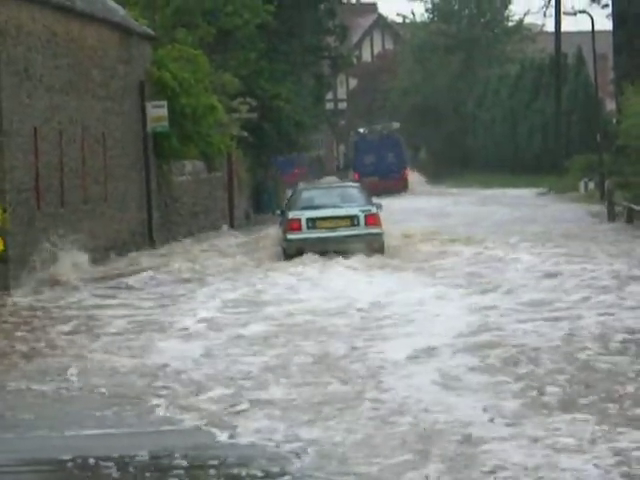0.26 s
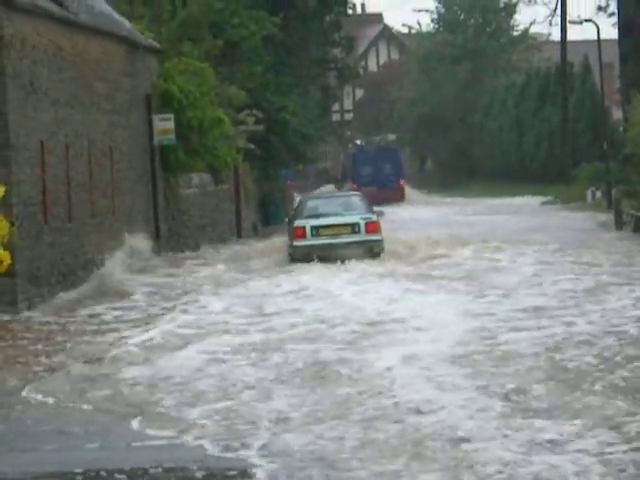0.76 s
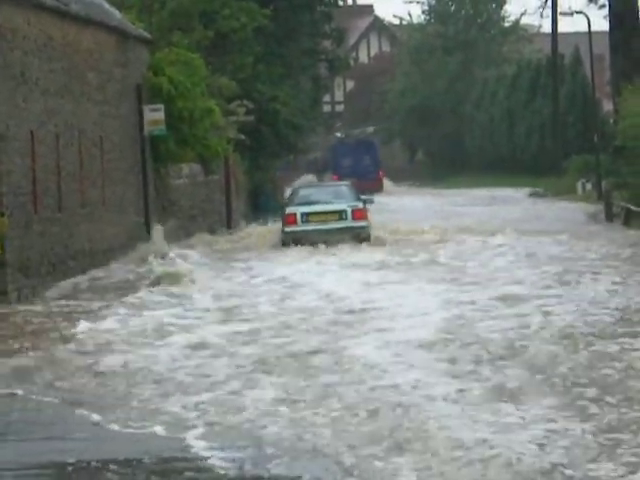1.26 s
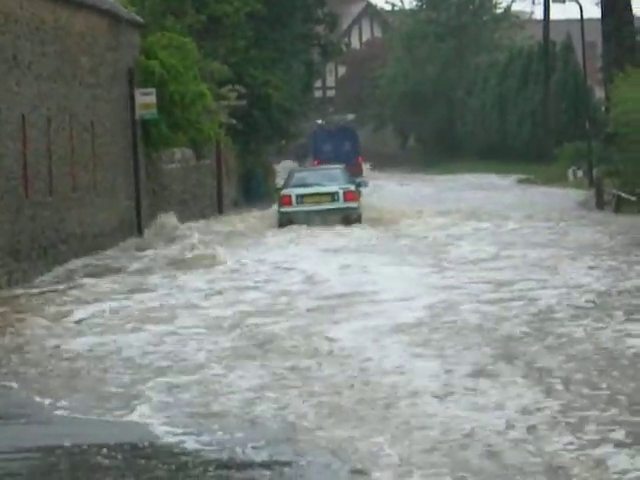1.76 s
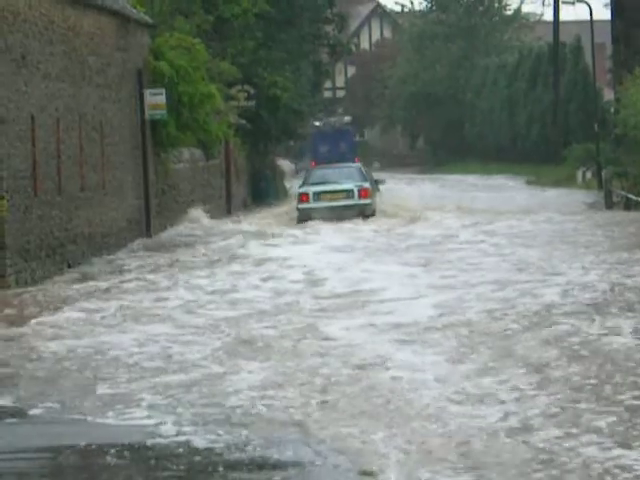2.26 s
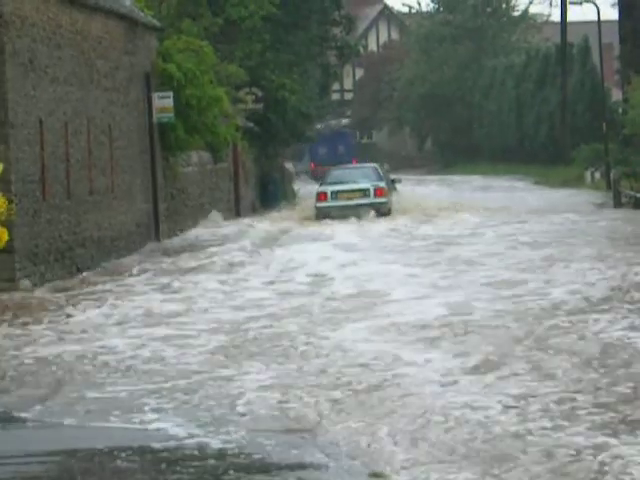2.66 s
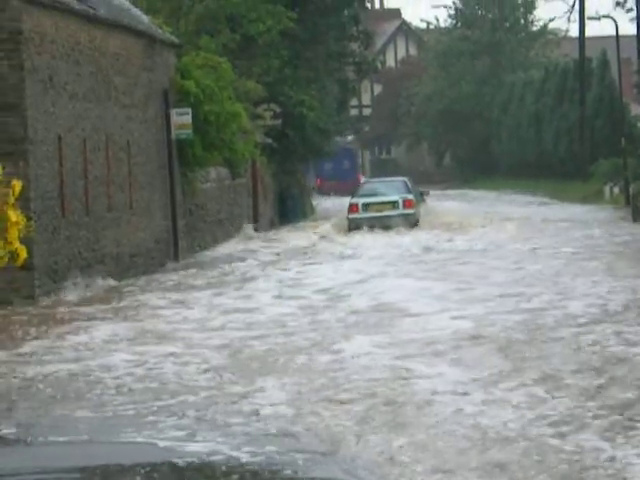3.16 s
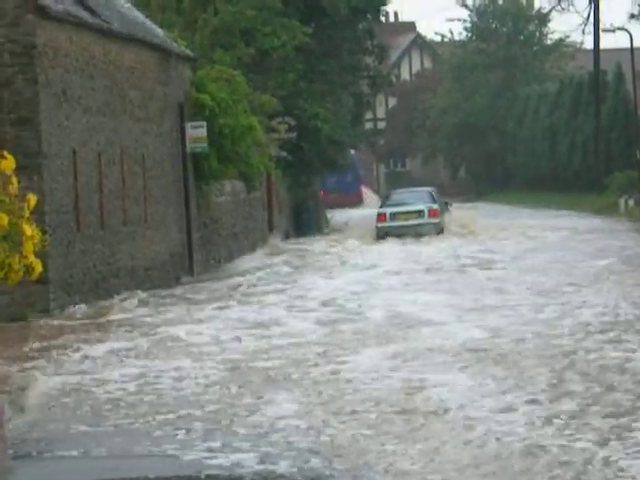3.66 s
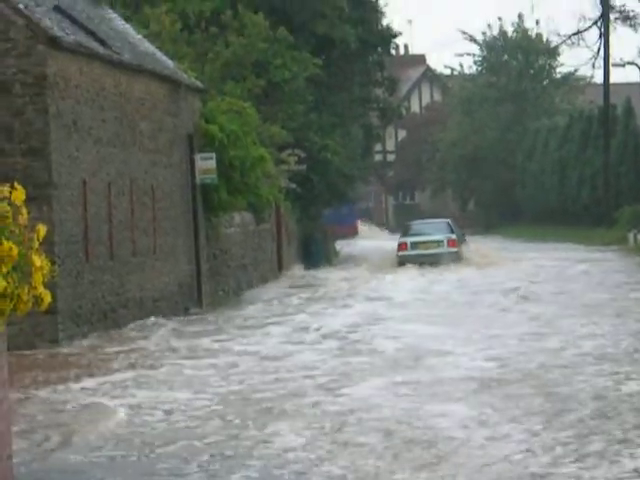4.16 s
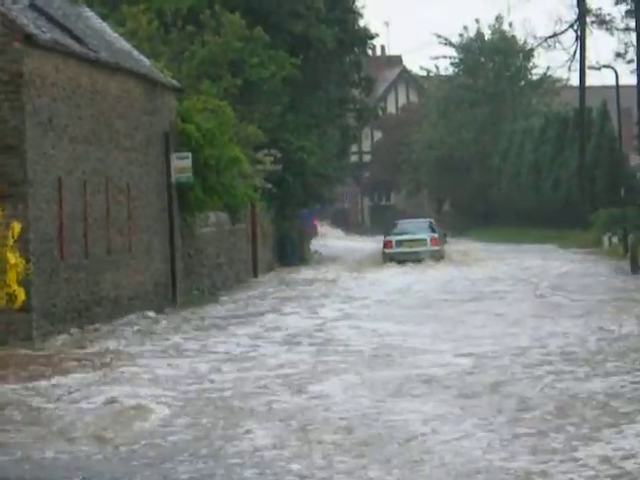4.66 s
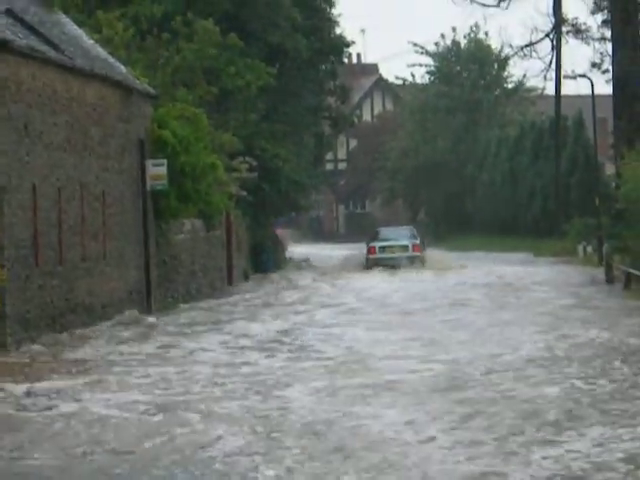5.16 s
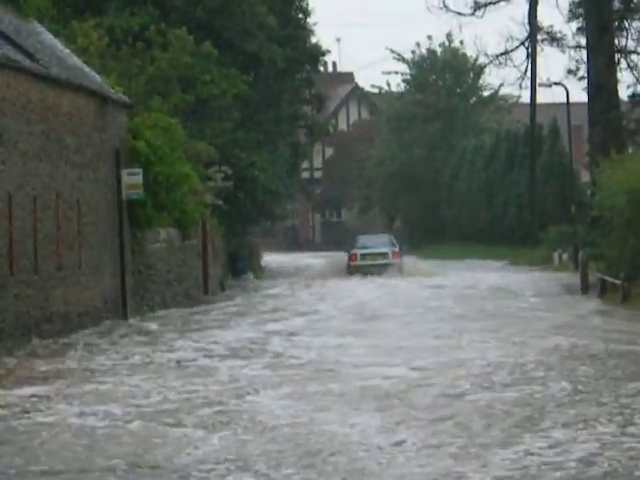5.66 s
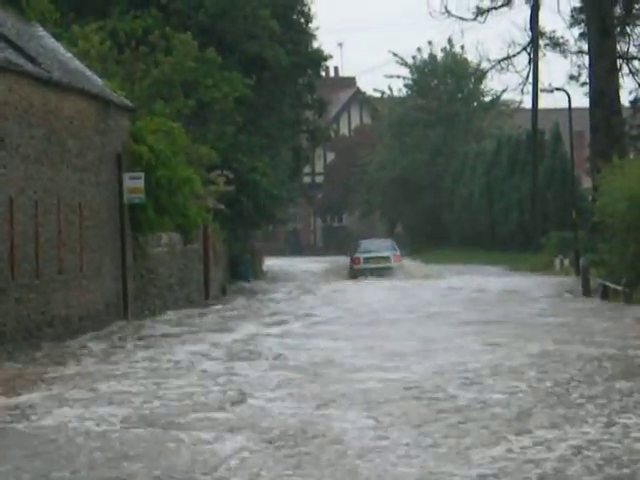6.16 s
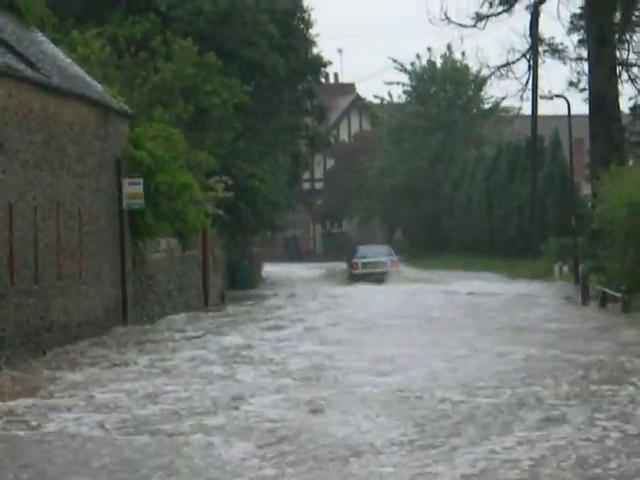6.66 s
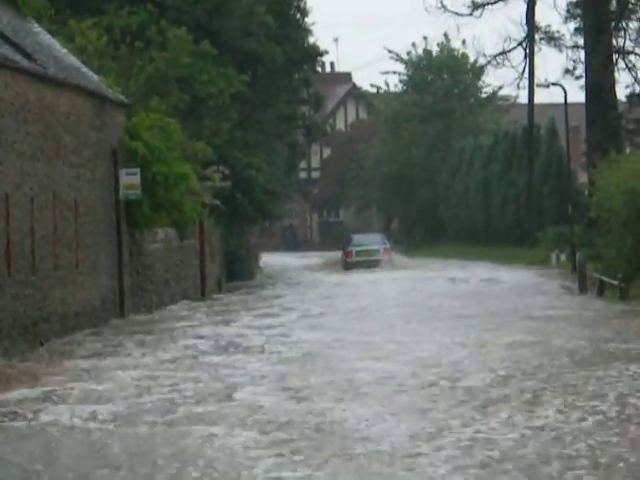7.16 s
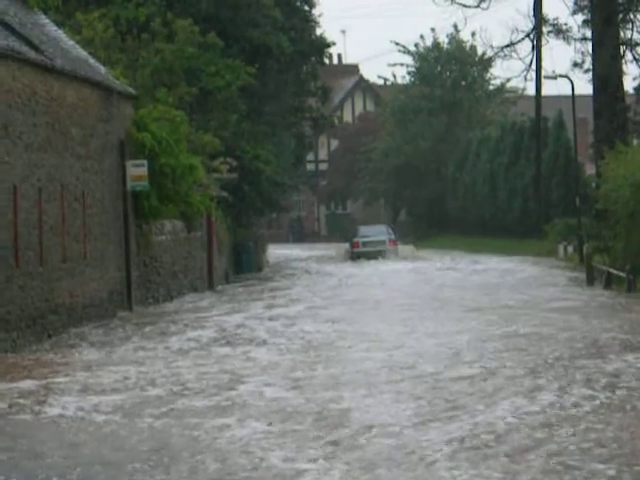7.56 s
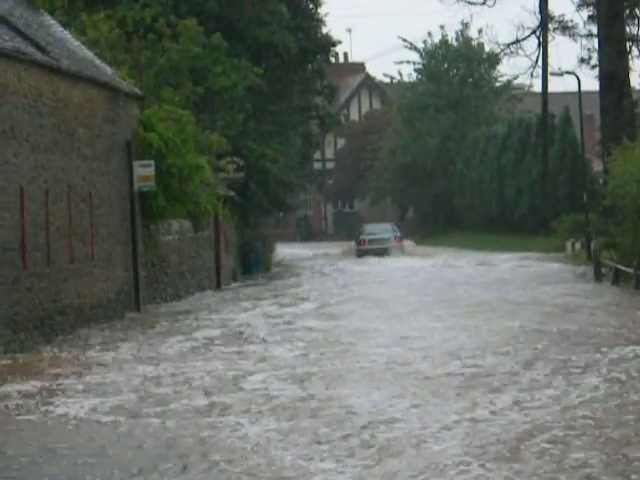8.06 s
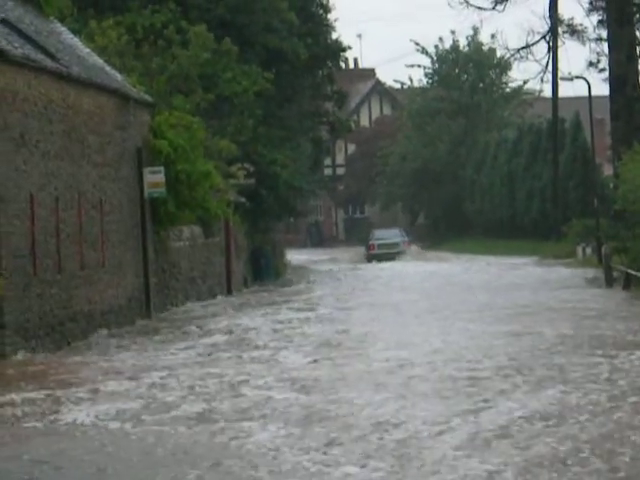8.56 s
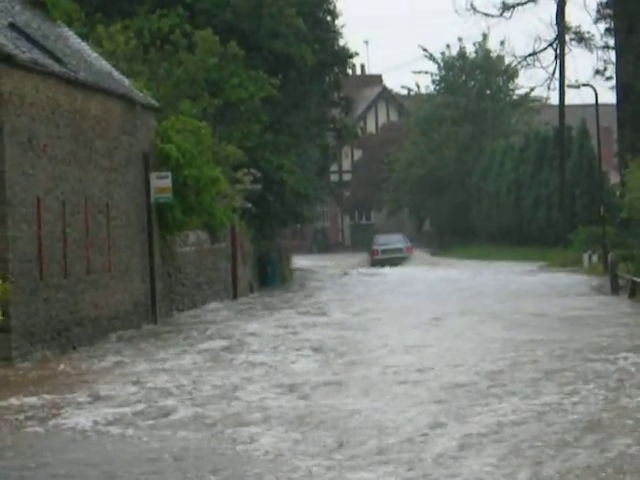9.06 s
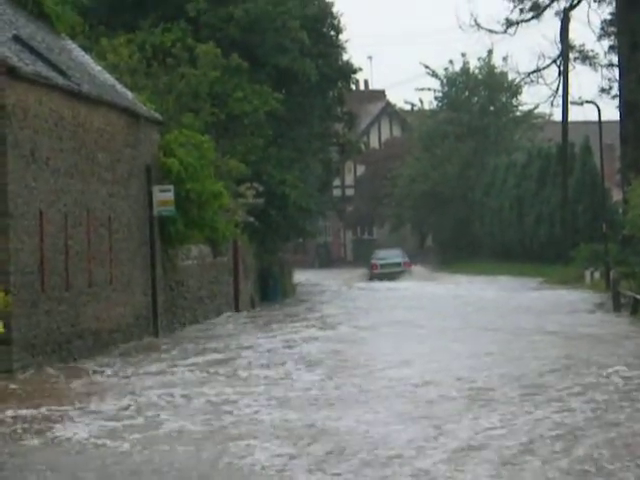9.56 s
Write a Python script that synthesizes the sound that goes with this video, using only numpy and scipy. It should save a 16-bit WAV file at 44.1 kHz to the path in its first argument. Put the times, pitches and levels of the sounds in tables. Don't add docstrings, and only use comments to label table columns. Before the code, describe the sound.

Muffled, narrow-band rush of turbulent water, constantly fizzing and slapping, over the low labouring hum of a car wading into the distance.

```python
import sys
import numpy as np
from scipy import signal
from scipy.fft import rfft, irfft
from scipy.io import wavfile
from scipy.ndimage import uniform_filter1d

SR = 44100
rng = np.random.default_rng(int(sys.argv[2]) if len(sys.argv) > 2 else 0)


def ratio(d):
    e = np.asarray(d, float) / 20
    return 10 ** e


def log_audio(samples):
    frames = np.atleast_2d(samples).T
    limited = np.clip(frames, -1, 1)
    pcm = np.round(limited * 32767).astype(np.int16)
    wavfile.write(sys.argv[1], SR, pcm)


N = 433048
OFFSET = -.02


def evened(x):
    return x / np.sqrt(np.mean(x ** 2) + 1e-20)


def read(points, hz):
    f, value = np.transpose(points)
    return np.interp(np.log(hz + 1), np.log(f + 1), value)


def follow(rows):
    s, *columns = np.transpose(rows)
    return [np.interp(np.arange(N) / SR, s, c) for c in columns]


def drift(rate_hz):
    z = rfft(rng.standard_normal(N))
    hz = np.fft.rfftfreq(N, 1 / SR)
    return evened(irfft(z / (1 + (hz / rate_hz) ** 2), N))


def burst(hz, cycles, rise_cycles=0.37, glide=.12):
    turns = np.arange(-3 * SR // hz, 8 * SR * max(cycles, .5) // hz) * hz / SR
    fall = (np.hypot(turns, .15) - .15) / max(.65 * cycles, .2)
    shape = np.exp(-np.where(turns < 0, (turns / rise_cycles) ** 2, fall))
    sound = shape * np.cos(2 * np.pi * (turns + glide * turns * abs(turns) / 2) - .5)
    if hz < 1600:
        crack_turns = turns * 2200 / hz
        sound += .45 * np.exp(-(crack_turns / .3) ** 2) * np.cos(2 * np.pi * crack_turns + .6)
    sound = sound - shape * sound.sum() / shape.sum()
    return sound / sound.max(), shape, int(3 * SR // hz)


def strike(events):
    out, cover = np.zeros(N + SR), np.zeros(N + SR)
    for s, db, hz, cycles in events:
        sound, shape, lead = burst(hz, cycles)
        at = round(s * SR) - lead
        out[at:at + len(sound)] += (ratio(db) - OFFSET) * sound
        cover[at:at + len(sound)] += 1.3 * shape
    return out[:N], np.clip(cover[:N], 0, 1)


def drone(hz, db, waver=.005, throb_db=2.5):
    turns = np.cumsum(hz * (1 + waver * drift(3))) / SR
    return 1.25 * ratio(db + throb_db * drift(5)) * np.sin(2 * np.pi * turns)


# frequency in Hz, level in dB.
IDLE = [(57, -69), (114, -48.5)]


def idling_engine():
    return sum(drone(hz, db) for hz, db in IDLE)


def far_engine():
    from_s, to_s, fade_s = 6.9, 8.2, .4
    start_hz, rise_hz_per_s = 63, 7
    t = np.arange(N) / SR
    heard = np.clip(np.minimum(t - from_s, to_s - t) / fade_s + 1, 0, 1)
    return heard * drone(start_hz + rise_hz_per_s * (t - from_s), -57)


# time in seconds, firing rate in Hz, labouring (2nd order) level in dB.
CAR = [(0, 80.5, -43), (.5, 81, -36), (1, 82, -37), (2, 86, -44), (2.5, 85.2, -49), (3, 87, -53),
       (3.7, 90.8, -55), (4, 91.2, -53), (4.7, 90.9, -53), (5.3, 87.5, -40), (6.3, 86.6, -38), (7, 85, -44),
       (8, 83, -45), (9, 78.4, -45)]


def wading_car():
    pipe_hz, pipe_width_hz, pipe_peak_db, away_db_per_s = 454, 18, -23.5, .8
    t = np.arange(N) / SR
    hz, labour_db = follow(CAR)
    detuning = 2 * (5 * hz - pipe_hz) / pipe_width_hz
    pipe_db = pipe_peak_db - away_db_per_s * t - 10 * np.log10(1 + detuning ** 2)
    firing = drone(hz, -52, throb_db=3.5)
    labour = drone(2 * hz, labour_db, throb_db=3.5)
    return firing + labour + drone(5 * hz, pipe_db, throb_db=2)


def foam(patchy_db=0.38, flicker_db=-0.65):
    frames = N // 128 + 5
    a, b, patches, gusts = rng.standard_normal((frames, 257, 4)).T
    patches = evened(uniform_filter1d(uniform_filter1d(patches, size=6, axis=0), size=16, axis=1))
    gusts = evened(uniform_filter1d(uniform_filter1d(gusts, size=40, axis=0), size=3, axis=1))
    z = (a + 1j * b) * ratio(patchy_db * patches + flicker_db * gusts)
    return evened(signal.istft(z, nperseg=512, noverlap=384)[1][:N])


def drops(per_s=500, spread_db=3):
    happens = rng.random(N) < per_s / SR
    size = ratio(spread_db * np.minimum(rng.exponential(1, N), 4.5)) * happens
    kind = rng.integers(0, 24, N)
    out = np.zeros(N)
    for k, hz in enumerate(np.geomspace(500, 4000, num=24)):
        grain = burst(hz, 1.5 + 0.85 * rng.random())[0]
        grain = grain / np.linalg.norm(grain) * np.sqrt(hz)
        out += signal.oaconvolve(size * (kind == k), grain)[:N]
    return evened(out)


# frequency in Hz, level in dB per Hz.
COLOUR = [(25, -43.5), (48, -34), (90, -24), (170, -11), (370, -3), (580, -0.5), (760, -3.5), (1200, -11.5),
          (1700, -11.5), (2300, -9.5), (2800, -12), (3300, -17)]
# time in seconds, level in dB.
SURGE = [(0, 2.5), (.4, .5), (.8, 2), (1.1, 0.5), (2, 0), (2.5, 1), (2.9, -0.5), (3.4, 0), (4.6, 0),
         (5.2, 0), (5.6, -1), (6.1, 0), (6.8, -1.5), (7.15, -1), (7.4, 1.5), (7.65, -.5), (8.7, -1.5),
         (9.2, -0.5)]


def rush(drop_share=0.16):
    roar_hz, fizz_hz = 300, 1100
    surge_share = (.6, .95, 0.18)
    recede_db_per_s = (0.26, 0.0043, 0.11)
    hz = np.fft.rfftfreq(N, 1 / SR)
    water = np.sqrt(1 - drop_share ** 2) * foam() + drop_share * drops()
    z = rfft(water) * ratio(read(COLOUR, hz))
    z = z / np.sqrt(np.mean(abs(z) ** 2))
    roar = 1 / (1 + (hz / roar_hz) ** 6)
    fizz = 1 / (1 + (fizz_hz / (hz + 1)) ** 6)
    slosh = 1 - roar - fizz
    t = (np.arange(N) - N / 2) / SR
    surge_db = follow(SURGE)[0]
    surge_db = surge_db - surge_db.mean()
    out = np.zeros(N)
    for band, share, fade in zip((roar, slosh, fizz), surge_share, recede_db_per_s):
        out += ratio(share * surge_db - fade * t) * irfft(z * band, N)
    return ratio(-15) * evened(out)


# time in seconds, peak in dB, pitch in Hz.
SLAPS = [(.0771, -2, 820), (.4973, 2.5, 686), (.7745, -3.5, 1400), (1.291, -3, 820), (1.8404, -2.5, 670),
         (1.8742, -3, 600), (2.387, 0, 2730), (2.4187, -1, 660), (2.6461, -5.5, 670), (3.2792, -6.5, 2230),
         (3.505, -12, 900), (3.6918, -7.5, 673), (4.1663, -2, 850), (4.228, -6, 2050), (4.299, -5, 724),
         (4.8321, -6, 1410), (5.049, -1, 2010), (5.141, -3, 2040), (5.1705, 0.5, 685), (5.2122, -4, 1990),
         (5.3311, -4, 2390), (5.756, -3, 2600), (6.2203, -2.5, 2230), (6.3308, -13, 656), (6.573, -2, 1200),
         (7.347, -4, 1790), (7.445, -0.5, 900), (8.7725, -3, 657), (9.0956, -2, 2450), (9.217, 0.5, 746)]


def slaps():
    crest = .68
    events = [(s, db, hz, 0.99 + .15 * np.log2(hz / 1000)) for s, db, hz in SLAPS]
    near, cover = strike(events)
    water = (1 - 0.43 * cover) * rush() + 0.86 * near
    return water / (1 + (water / crest) ** 6) ** (1 / 6)


# time in seconds, peak in dB, pitch in Hz, ringing in cycles.
BLOWS = [
    (2.1637, -2.05, 2100, 1),
    (2.941, -2.16, 1200, .7),
    (4.7002, -2.2, 850, 1.2),
    (5.8191, -.2, 1250, .6),
    (6.0508, -2.25, 700, .9),
    (7.1610, -1.6, 1900, 1.6),
    (7.3282, -1.5, 2100, 1.5),
    (8.4076, -2.9, 1120, 1.4),
    (9.008, -.9, 830, 2.1),
    (9.7264, -2.6, 1200, 1.2),
]


def scene():
    blows, cover = strike(BLOWS)
    engines = wading_car() + far_engine() + idling_engine()
    return ((1 - cover) * (slaps() + engines) + blows)[None]


def low_pass(x):
    return signal.sosfilt(signal.butter(12, 15800, fs=SR, output="sos"), x)


# frequency in Hz, gain in dB.
EDGE = [(3300, 0), (3700, -8.5), (4100, -20), (4400, -36.5), (4650, -59.5), (4900, -110)]


def record(dry):
    ceiling = .707
    hz = np.fft.rfftfreq(N, 1 / SR)
    z = rfft(dry) * ratio(read(EDGE, hz))
    rim = irfft(z / (1 + (4000 / (hz + 1)) ** 30), N)
    limited = irfft(z, N) + rim * (ratio(1.5 * drift(60)) - 1)
    return low_pass(np.clip(limited + OFFSET, -ceiling, ceiling))


dry = scene()
out = record(dry)
log_audio(out)
```